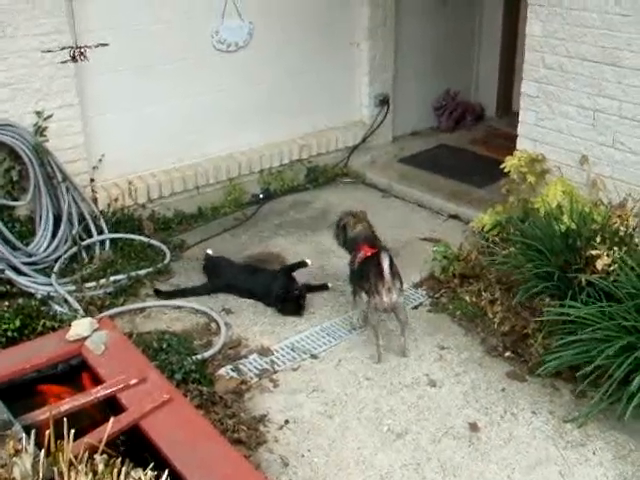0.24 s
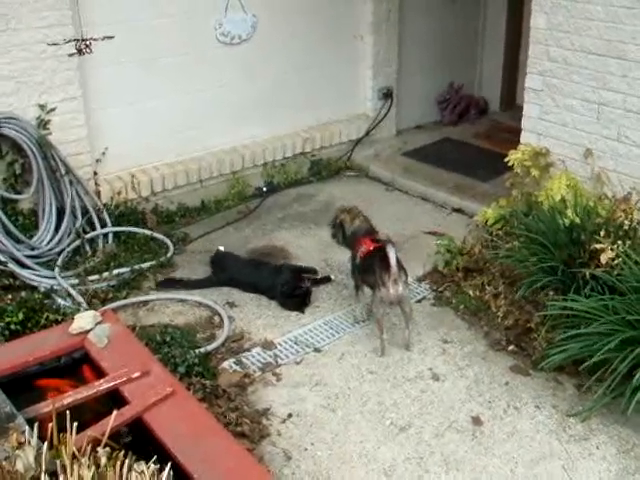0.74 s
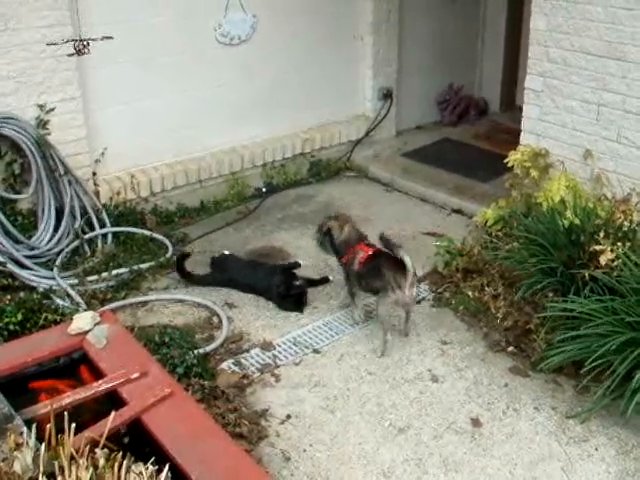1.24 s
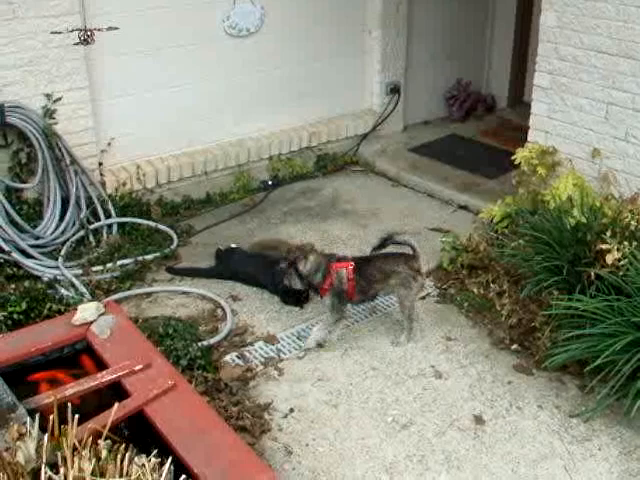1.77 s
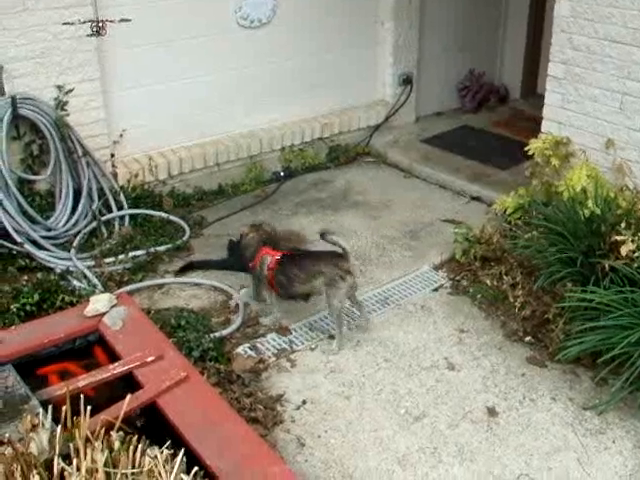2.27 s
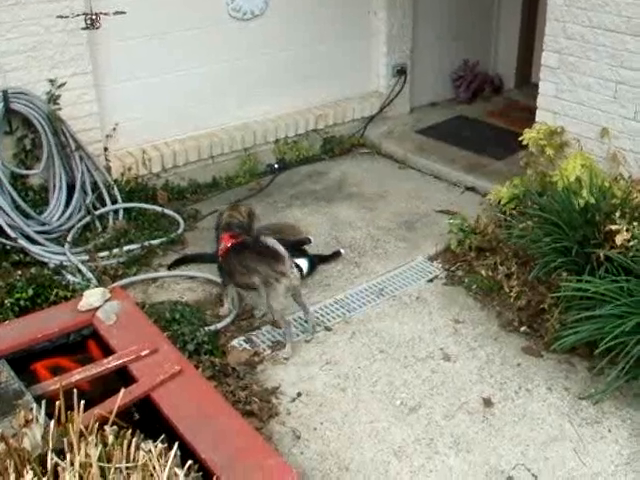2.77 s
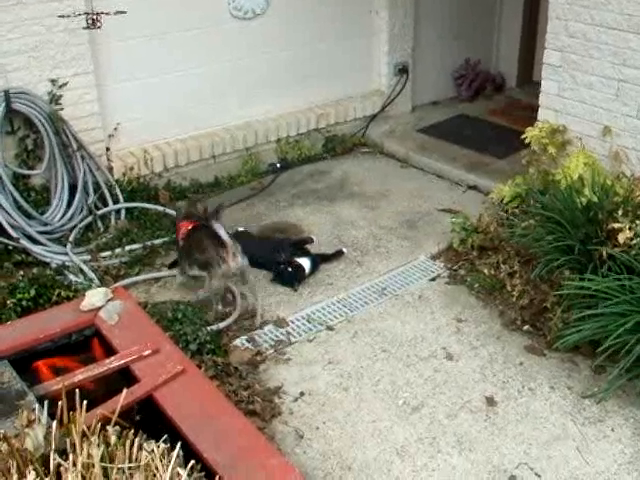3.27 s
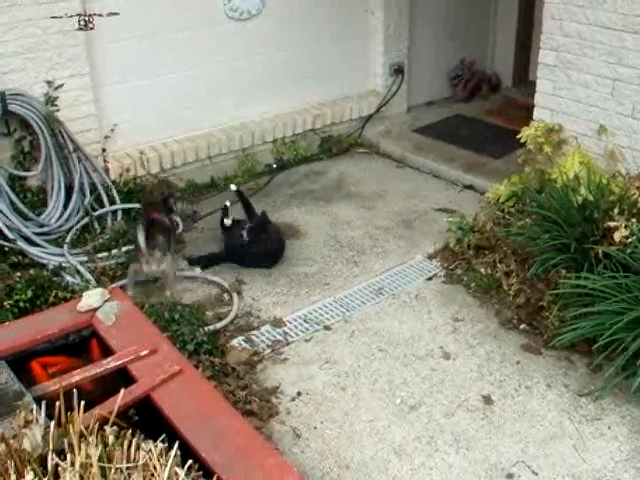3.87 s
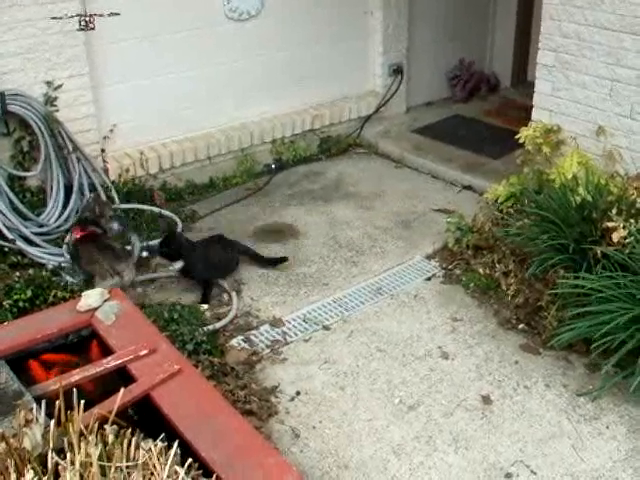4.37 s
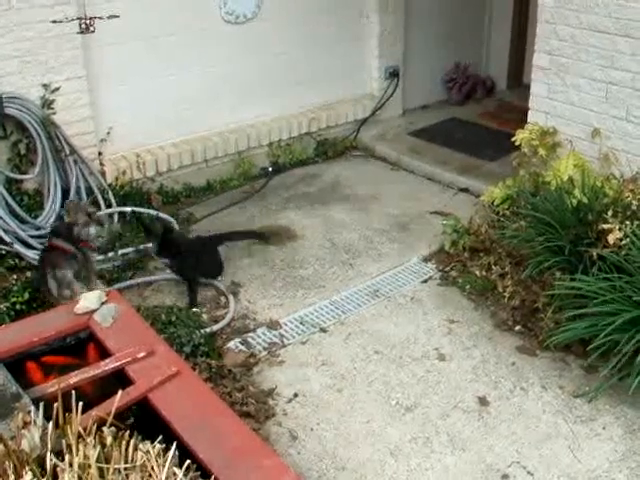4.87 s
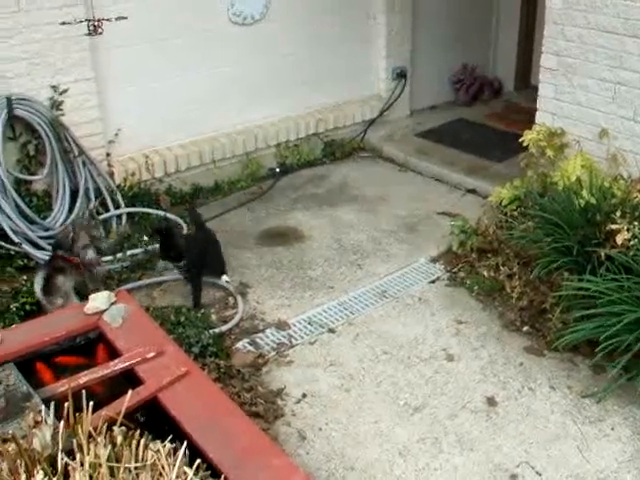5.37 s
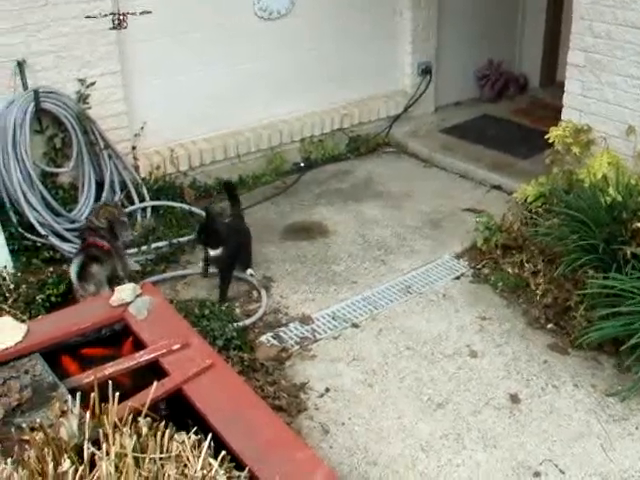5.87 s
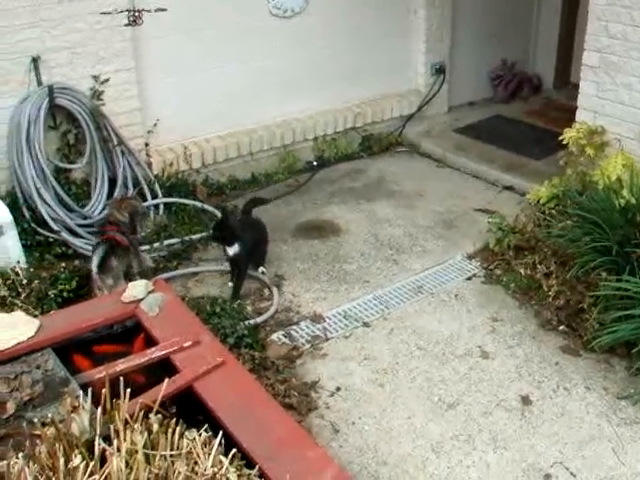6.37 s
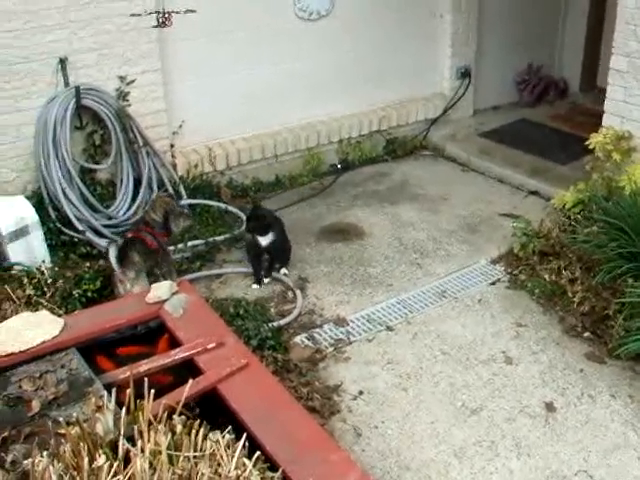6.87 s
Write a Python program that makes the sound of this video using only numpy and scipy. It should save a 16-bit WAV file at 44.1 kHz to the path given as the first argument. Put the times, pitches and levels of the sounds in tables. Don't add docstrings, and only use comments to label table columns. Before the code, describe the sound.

A small dog and cat scrape and rustle on a patio, with sharp claw clicks, two rising bird whistles and distant engine drone.

```python
import sys
import numpy as np
from scipy import signal
from scipy.fft import rfft, irfft, next_fast_len
from scipy.io import wavfile
from scipy.ndimage import uniform_filter1d

SR = 44100
rng = np.random.default_rng(int(sys.argv[2]) if len(sys.argv) > 2 else 0)


def volts(x):
    e = np.asarray(x, float) / 20
    return 10 ** e


def generate_wav(signal):
    frames = np.transpose(np.atleast_2d(signal))
    scaled = np.clip(frames, -1, 1) * 32767
    pcm = np.round(scaled).astype(np.int16)
    wavfile.write(sys.argv[1], SR, pcm)


N = 314212


def rms_one(x):
    return x / np.sqrt(np.mean(x ** 2) + 1e-20)


def in_time(rows):
    s, *columns = np.transpose(rows)
    return [np.interp(np.arange(N) / SR, s, column) for column in columns]


def colour(x, spectrum):
    hz, db = np.transpose(spectrum)
    size = next_fast_len(N)
    f = np.arange(size // 2 + 1) * SR / size + 1e-3
    gain = volts(np.interp(np.log(f), np.log(hz), db, left=-120, right=-120))
    return rms_one(irfft(rfft(x, size) * gain, size)[:N])


def drift(rate_hz):
    r = np.exp(-2 * np.pi * rate_hz / SR)
    noise = rng.standard_normal(N + SR)
    return rms_one(signal.lfilter([1], [1, -2 * r, r * r], noise)[SR:])


def echoes(x, walls):
    out = x.copy()
    for delay_s, db in walls:
        lag = int(delay_s * SR)
        out[lag:] += volts(db) * x[:N - lag]
    return out


def swells(rows):
    t = np.arange(0, N, 40) / SR
    lift = sum(db * np.exp(-((t - s) / length) ** 2) for s, length, db in rows)
    return np.interp(np.arange(N) / SR, t, lift)


# centre_hz, half_width_hz, rms_db
MACHINE_LINES = [(80.34, 15, -60), (280.8, 20, -63.5)]


def machine(white):
    out = 0
    for hz, width, db in MACHINE_LINES:
        line = [(hz - width, -30), (hz - width / 3, 0), (hz + width / 3, 0), (hz + width, -30)]
        out = out + volts(db) * colour(white, line)
    return out


# time_s, level_db
TRAFFIC = [(0, -49), (2.8, -50), (4.4, -53), (6.4, -54), (7.12, -53)]
# frequency_hz, density_db_per_hz
RUMBLE = [(8.8, -25), (15, 6.5), (32, 6.5), (62, -7.5), (81, -30), (140, -120)]
DRONE = [(33, -35.5), (56, -0.5), (76, 7.5), (110, -7.5), (140, -26), (240, -120)]
HUM = [(62, -32.5), (105, -1.5), (145, 1.5), (188, 1), (210, -14.5), (240, -17), (310, -44.5), (530, -120)]
AIR = [(150, -13.5), (300, -6), (640, -12.5), (1110, -16), (2000, -17.5), (2500, -21.5), (7900, -26),
       (9000, -33.5)]
# peak_s, length_s, lift_db
RUMBLE_PASSES = [
    (0.306, 0.3, 4),
    (2.695, 0.41, 6),
    (4.28, .25, 8),
]
DRONE_PASSES = [(0.021, 0.16, 4.5), (1.0, 0.19, 8), (1.5, 0.16, 3.6), (1.842, 0.12, 10.3), (2.5, 0.19, 7.8),
                (3.721, 0.4, 4.2), (4.98, 0.089, 6.7)]
HUM_PASSES = [(3.7, 0.32, 2), (4.8, .12, 5.4), (6.2, .12, 4), (6.72, 0.11, 12), (6.901, .12, 13),
              (7.08, 0.15, 14)]


def background():
    white = rng.standard_normal((5, N))
    traffic_db = in_time(TRAFFIC)[0]
    out = volts(-48 + 0.79 * drift(7.3)) * colour(white[3], AIR) + machine(white[4])
    bands = [(-5.5, RUMBLE_PASSES, RUMBLE), (-1, DRONE_PASSES, DRONE), (-4, HUM_PASSES, HUM)]
    for (band_db, passes, spectrum), noise in zip(bands, white):
        level_db = traffic_db + band_db + swells(passes) + 0.41 * drift(3.4)
        out += volts(level_db) * colour(noise, spectrum)
    return out


# time_s, firing_hz
FIRING = [(0, 22.8), (.59, 22.43), (1.65, 22.73), (3.4, 22.03), (4.9, 21.35), (6.1, 21.87), (6.6, 21.27)]
# multiple_of_firing, level_db against the traffic
ENGINE_ORDERS = [(5, -6), (6, -9), (7, -1.5), (8, -6), (9, -11)]
# frequency_hz, rms_db
MAINS = [(120, -61), (180, -56), (240, -62)]


def engine():
    turn = 2 * np.pi * np.cumsum(in_time(FIRING)[0]) / SR
    t = np.arange(N) / SR
    orders = sum(volts(db + 2.5 * drift(1.5)) * np.sin(k * turn + k * k) for k, db in ENGINE_ORDERS)
    mains = sum(volts(db + 2 + 1.5 * drift(1.5)) * np.sin(2 * np.pi * hz * t) for hz, db in MAINS)
    return volts(in_time(TRAFFIC)[0] + 1.0) * orders + mains


def grains(per_s, spread_db):
    size_db = spread_db * np.minimum(rng.exponential(1, N), 3.0)
    sizes = volts(size_db) * rng.choice([-1, 1], N)
    return sizes * (rng.random(N) < per_s / SR)


def leaves(snaps):
    clumps = rng.integers(0, 7, N // 150 + 1)
    leaf = np.repeat(clumps, 150)[:N]
    out = snaps.copy()
    for k, hz in enumerate(np.geomspace(4550, 7760, 7)):
        b, a = signal.iirpeak(hz, 1 / 0.065, fs=SR)
        out += volts(4) * signal.lfilter(b, a, snaps * (leaf == k))
    return out


def add(layers, at, shape, weight_db):
    gains = volts([[0], [-5 + 0.79 * weight_db], [-4 + weight_db]])
    layers[:, at:at + len(shape)] += gains * shape


# start_s, level_db, concrete_weight_db, t60_s
SCUFFS = [(0.1438, -36, -25, .08), (1.153, -44.5, -6, .1), (1.459, -42, -15, 0.074),
          (1.5574, -40.5, -7, 0.086), (1.6367, -43.5, -12, 0.27), (1.6824, -45.5, -14, 0.088),
          (1.7803, -42.5, -7, 0.3), (1.829, -40, -13, 0.051), (1.9675, -40, -5, 0.11),
          (2.001, -40.5, -8.5, 0.11), (2.03, -47, -11, 0.11), (2.2706, -36.5, -21, 0.095),
          (2.59, -21, -18.5, 0.052), (2.6187, -37.5, -6, 0.11), (2.736, -39, -27, 0.16),
          (3.035, -48, -7, .2), (3.239, -39.5, -4, 0.082), (3.3158, -40, -14, 0.15), (3.413, -27, -22, 0.1),
          (3.504, -23.5, -3.5, 0.15), (3.57, -46.5, -7, 0.26), (3.732, -47, -8, 0.094),
          (3.8495, -40.5, 1, 0.16), (3.9556, -44.5, -6, 0.098), (4.065, -34.5, -18, 0.17),
          (4.8874, -44.5, -3, 0.083), (5.4008, -46.5, -5.5, 0.38), (5.6096, -55, -2, 0.17),
          (5.804, -49, -8, 0.21), (6.554, -54.5, 2.5, 0.15)]
# start_s, level_db, concrete_weight_db, hold_s
SHUFFLES = [(2.583, -25, -30, 0.0055), (3.407, -28, -19.5, 0.0052), (3.3836, -43.5, -12.5, 0.045),
            (3.4754, -23.5, -13, 0.017), (3.981, -48.5, -13, 0.048), (4.025, -28, -12, 0.026),
            (4.1627, -34, -12.5, 0.086), (4.3343, -39.5, -12.5, 0.028), (4.443, -39.5, -13.5, .035),
            (4.546, -42.5, -7, 0.019), (4.574, -45.5, -16, .025), (4.6224, -39, -4, 0.027),
            (4.6567, -47, 5.5, 0.0092), (4.255, -40, -15, 0.0087), (4.451, -39.5, -19, 0.011),
            (4.978, -46, -14, 0.03), (4.764, -41, -4.5, 0.062), (5.061, -45, -8.5, 0.12)]
# loudest_s, swell_s, fade_s, level_db, concrete_weight_db
DRAGS = [
    (1.5, 0.15, 0.18, -47, -13.5),
    (3.3, 0.27, 0.19, -49.5, -21.5),
    (3.901, 0.43, .15, -50.5, -8),
    (4.502, .5, 0.28, -41.5, -6),
    (5.16, 0.32, .14, -34.5, -5),
    (5.7, 0.23, 0.13, -47.5, -7),
    (5.881, 0.23, 0.17, -51.5, -10),
]
# frequency_hz, density_db_per_hz
LEAF = [(2300, -46.5), (3800, -11), (4300, -8), (5000, -0.5), (6600, -2), (7300, 4), (8000, 2),
        (16000, -29)]
GRIT = [(2000, -45.5), (2500, -4.5), (3200, 0), (4000, -4.5), (4700, -9.5)]
SLAB = [(500, -20.5), (900, 1.5), (1500, 1.5), (2000, 11), (2400, -1), (2900, -40.5)]


def paws():
    snaps = rms_one(grains(per_s=6500.0, spread_db=4.0) * volts(1.5 * drift(80.0)))
    layers, t = np.zeros((3, N)), np.arange(SR // 2) / SR
    moves = [(s, db, weight, 0, t60) for s, db, weight, t60 in SCUFFS]
    moves += [(*row, 0.22) for row in SHUFFLES]
    for s, db, weight_db, hold, t60 in moves:
        at = round(s * SR)
        snaps[at + 25] = 4.5
        held_db = -47.5 * np.minimum(t, hold)
        dying_db = -60 * np.maximum(t - hold, 0) / np.clip(t60, .02, .3)
        bite = 1 - np.exp(-t / 0.0011)
        add(layers, at - 90, volts(db + held_db + dying_db) * bite, weight_db)
    for s, swell, fade, db, weight_db in DRAGS:
        t = np.arange(-round(swell * SR), round(fade * SR)) / SR
        away = np.maximum(-t / swell, t / fade)
        add(layers, round((s - swell) * SR), volts(db - 21.5 * away ** 1.3), weight_db)
    levels = layers * volts([1.3 * drift(25.0) for body in layers])
    leaf, grit, slab = colour(leaves(snaps), LEAF), colour(snaps, GRIT), colour(snaps, SLAB)
    return levels[0] * leaf + levels[1] * grit + levels[2] * slab


# start_s, length_s, rms_db, hoarseness_0_to_1
FAR_CALLS = [
    (.385, .12, -54, 0.4),
    (.92, .16, -55, 0.5),
    (1.98, 0.13, -53, 0.7),
    (4.964, 0.065, -50.5, .45),
    (5.503, 0.079, -50.5, 0.2),
    (6.221, 0.092, -55, 0.3),
]
# start_s, length_s, pitch_hz, rms_db, hoarseness_0_to_1
PIPS = [
    (0.658, .03, 2140, -54.5, .3),
    (2.096, 0.04, 3360, -57.5, 0.5),
    (3.252, .108, 726, -44.5, .1),
    (3.823, .026, 2770, -42, 0.4),
    (6.567, 0.075, 660, -57, 0.2),
    (6.588, .022, 3240, -44, 1.2),
    (6.588, 0.018, 2650, -54, 1.0),
]


def notes():
    out = np.zeros(N)
    rasp = drift(140.0) + 1j * drift(140.0)
    far = [(s, length, 1531, db, hoarse) for s, length, db, hoarse in FAR_CALLS]
    for s, length, hz, db, hoarse in [*far, *PIPS]:
        at, size, share = round(s * SR), round(length * SR), np.clip(hoarse, 0, 1)
        sag = (1 - share) * (.01 / length) ** 2
        turn = 2 * np.pi * np.cumsum(hz * (1 - sag * np.linspace(0, 1, size) ** .5)) / SR
        voice = np.exp(1j * turn) + .3 * (hz < 2000) * share * np.exp(2j * turn)
        breath = 1 - share + share * rasp[at:at + size]
        note = rms_one(np.real(voice * breath))
        out[at:at + size] += signal.windows.tukey(size, .85) * volts(db + 3.0) * note
    return out


# start_s, peak_db, ring_hz, t60_s
TICKS = [(0.5337, -34.5, 3120, 0.011), (1.2083, -24, 6700, 0.002), (1.5143, -33.5, 463, 0.019),
         (1.4604, -50, 6000, 0.0045), (3.2408, -30, 7200, 0.0049), (4.333, -29, 4750, 0.012),
         (1.516, -20.5, 1940, 0.0025), (1.638, -26.5, 4030, 0.0014), (2.2715, -19, 5300, 0.0025),
         (2.591, -6.5, 7800, 0.0074), (2.605, -28, 6760, 0.002), (2.624, -26.5, 5840, 0.0038),
         (3.172, -24.5, 3480, 0.0039), (3.172, -33, 1860, 0.014), (3.1854, -28, 895, 0.0043),
         (3.195, -32, 397, 0.025), (3.4146, -18, 6970, 0.014), (3.422, -18, 5700, 0.0026),
         (4.0279, -11.5, 7480, 0.006), (4.039, -20, 7070, 0.0023), (4.0508, -14, 7410, 0.012),
         (4.857, -22, 6750, 0.0033), (4.87, -13, 6100, 0.002), (4.9403, -38, 5200, 0.016),
         (5.1335, -15.5, 7150, 0.0051), (5.698, -29, 6920, 0.0086), (6.309, -29, 2340, 0.0025),
         (6.436, -40, 2250, 0.0097), (6.54, -37, 2000, 0.006), (6.7306, -35, 5120, 0.0058)]


def claws():
    out, t = np.zeros(N), np.arange(1500) / SR
    for s, db, hz, t60 in TICKS:
        at = round(s * SR)
        crack = rng.standard_normal(len(t)) * np.exp(-t / 0.0004)
        ring = volts(-60 * t / max(t60, .001)) * np.sin(2 * np.pi * hz * t)
        out[at:at + len(t)] += volts(db + 1.5) * (ring + 0.16 * np.diff(crack, prepend=0))
    return out


# delay_s, level_db
YARD = [(.047, -22), (0.199, -22)]


def yard(x):
    t = np.arange(SR // 2) / SR
    tail = rng.standard_normal(len(t)) * volts(-60 * t / 0.5) * (t > .012)
    tail /= np.sqrt(np.sum(tail ** 2))
    return echoes(x, YARD) + volts(-5) * signal.fftconvolve(x, tail)[:N]


def span(rows, fade_s):
    first, last = rows[0][0], rows[-1][0]
    return np.interp(np.arange(N) / SR, [first - fade_s, first, last, last + fade_s], [0, 1, 1, 0])


# time_s, pitch_hz, level_db
GLIDE_A = [(2.13, 1227, -68), (2.29, 1545, -57.5), (2.34, 1670, -54.5), (2.42, 1735, -49.5),
           (2.56, 1947, -49), (2.68, 2120, -41), (2.72, 2198, -54.5), (2.79, 2384, -40.5),
           (2.86, 2488, -53)]
GLIDE_B = [(5.261, 1398, -68), (5.38, 1668, -52.5), (5.429, 1767, -50.5), (5.54, 1907, -48),
           (5.641, 2102, -45), (5.701, 2347, -45.5), (5.84, 2634, -43.5), (5.888, 2701, -48),
           (5.969, 2706, -57.5)]
# pitch_hz, level_db against the first
OCTAVE = [(1200, -3.5), (1500, 8), (1720, -4.5), (2000, -17), (2300, -29)]


def whistler():
    out = np.zeros(N)
    for rows in (GLIDE_A, GLIDE_B):
        hz, db = in_time(rows)
        fluttering_hz = uniform_filter1d(hz, size=2600) * (1 + .002 * drift(40.0))
        turn = 2 * np.pi * np.cumsum(fluttering_hz) / SR
        octave_db = np.interp(hz, *np.transpose(OCTAVE)) + 3.0 * drift(45.0)
        octave = volts(octave_db) * np.sin(2 * turn + .5 * drift(60.0))
        voice = np.sin(turn) + octave + volts(-20.5) * np.sin(3 * turn)
        out += span(rows, 0.032) * voice * volts(db + 4.0 + 2.6 * drift(32.0))
    return yard(out)


# delay_s, level_db
NEAR_WALLS = [(.0043, -23), (.0083, -16.5), (0.0152, -13.5), (.023, -16.5)]


def scene():
    animals = echoes(paws() + claws(), NEAR_WALLS)
    return (background() + engine() + animals + notes() + whistler())[None]


def band_limit(x):
    return signal.sosfilt(signal.butter(12, 8790, fs=SR, output="sos"), x)


def record(dry):
    step, offset = 1 / 128, .0005
    slow = signal.resample_poly(dry + offset, 160, 441, axis=1)
    stepped = signal.resample_poly(np.floor(slow / step) * step, 441, 160, axis=1)[:, :N]
    low_pass = signal.cheby2(10, 22, 8354 * 0.9956, fs=SR, output="sos")
    cut = signal.sosfiltfilt(low_pass, stepped)
    return band_limit(cut + volts(-100) * rng.standard_normal(dry.shape))


dry = scene()
out = record(dry)
generate_wav(out)
```